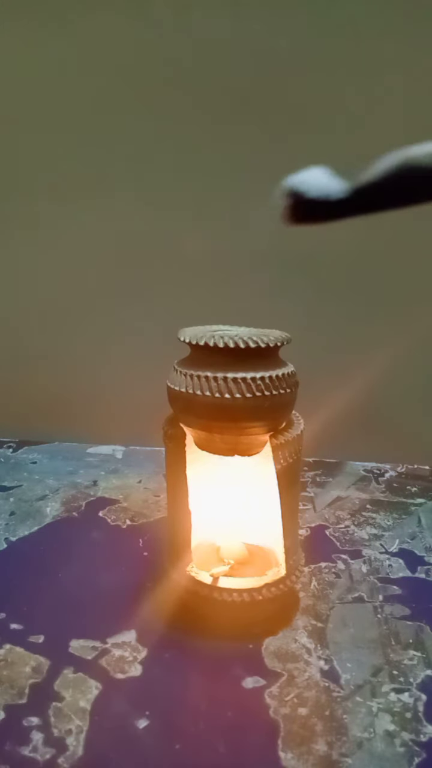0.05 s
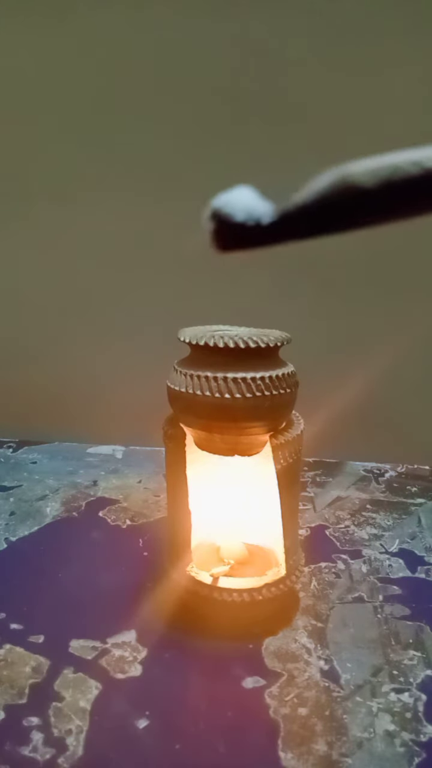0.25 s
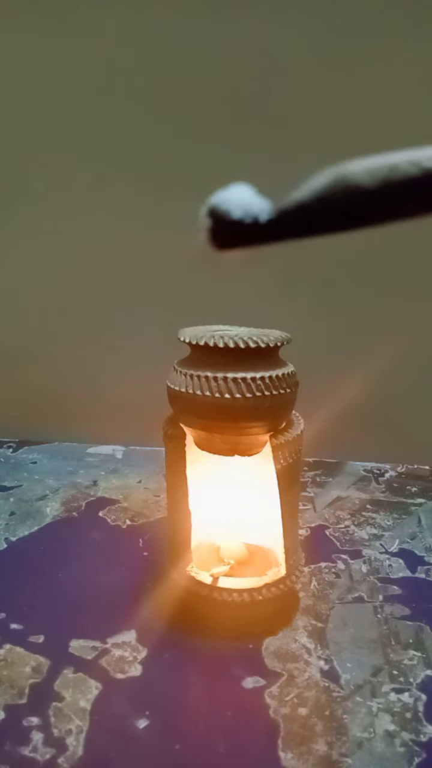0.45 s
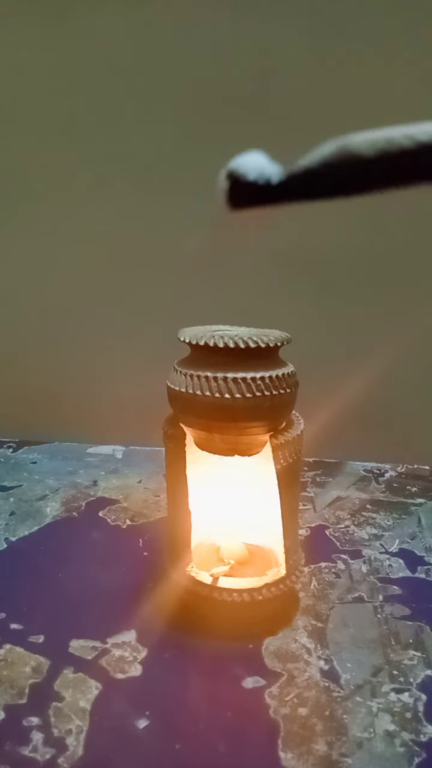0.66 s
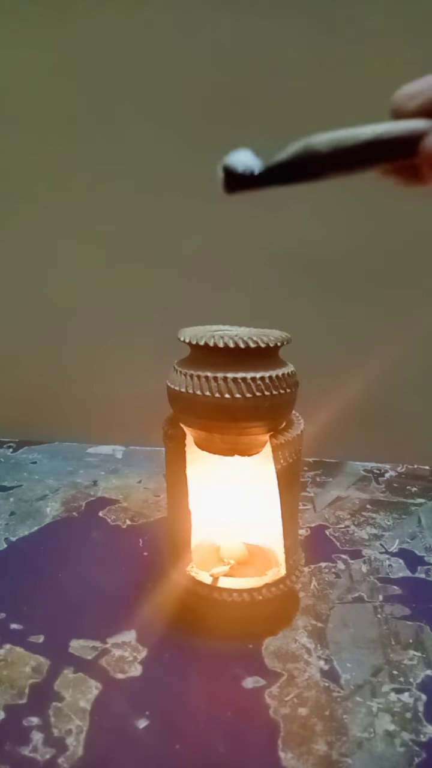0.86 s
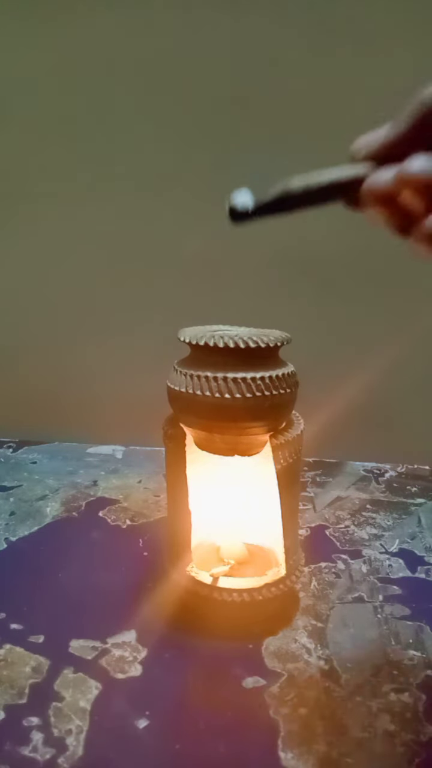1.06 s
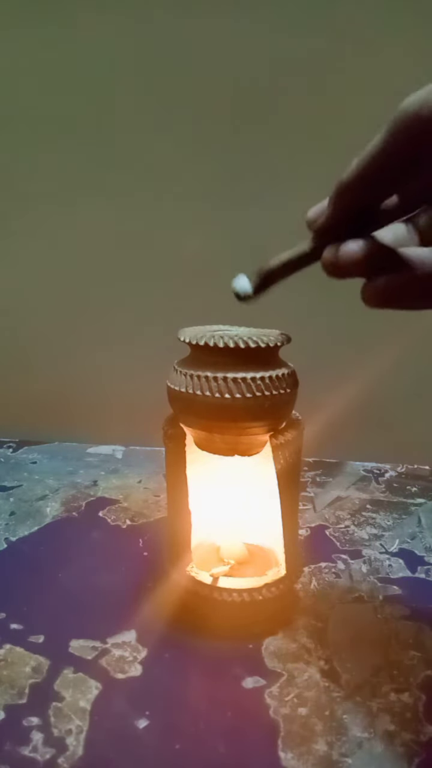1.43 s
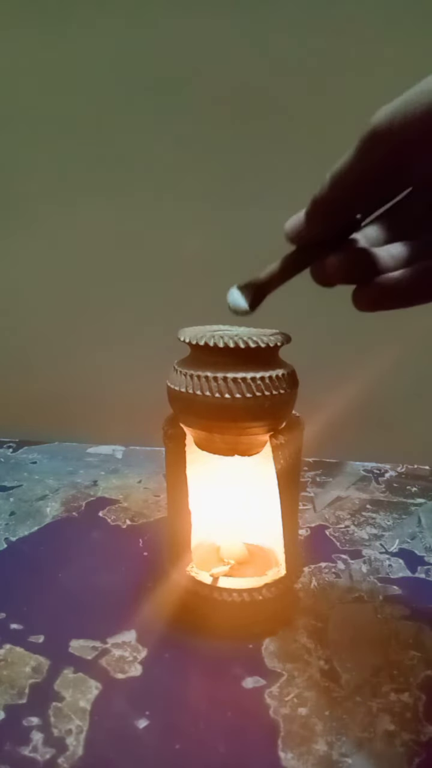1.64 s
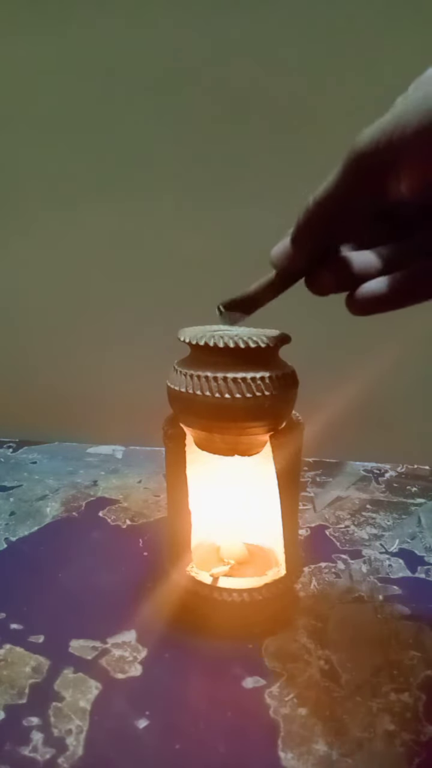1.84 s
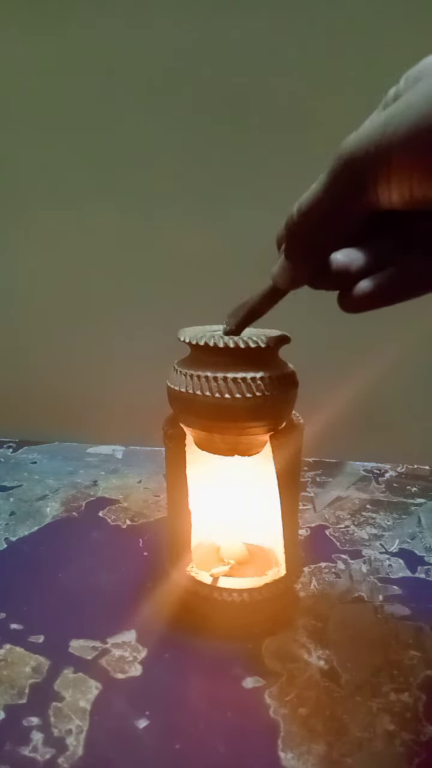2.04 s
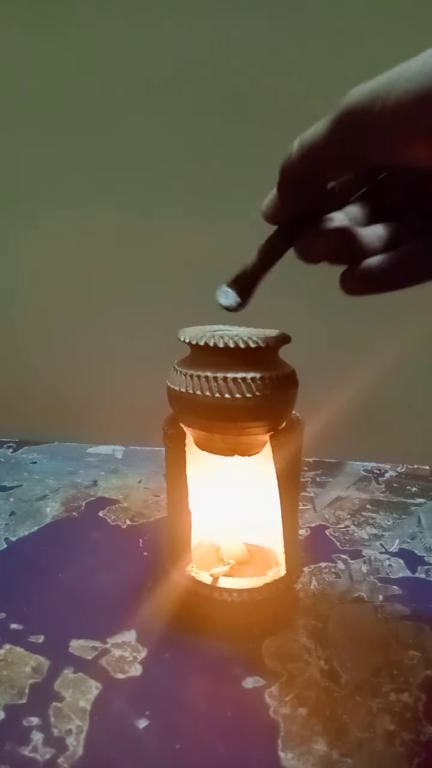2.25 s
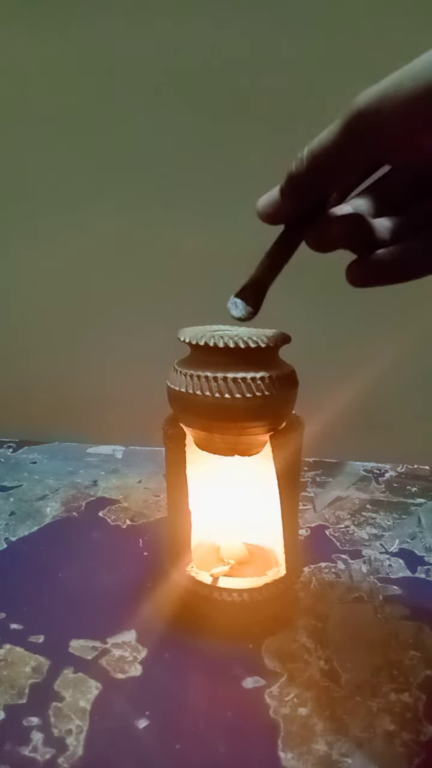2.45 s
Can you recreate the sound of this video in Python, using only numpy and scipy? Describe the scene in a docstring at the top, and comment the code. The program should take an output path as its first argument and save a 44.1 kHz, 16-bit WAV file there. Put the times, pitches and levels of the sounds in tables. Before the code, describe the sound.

A small stick knocks once on a clay toy stove over a faint hum.

```python
"""A motor hums over soft hiss in a small bare room. At 0.22 s a small stick knocks on a clay toy stove:
a light touch, the main blow 10 ms later, a short rebound. The clay rings briefly, the room answers
and a limiter ducks the blow. Faint bumps, ticks and a tap of handling follow while an airy rustle
swells and fades. Around 2 s the stick tip grazes the clay, and the hum carries on."""
import sys
import numpy as np
from scipy import signal
from scipy.fft import rfft, irfft
from scipy.io import wavfile
from scipy.ndimage import uniform_filter1d, minimum_filter1d

SR = 44100
rng = np.random.default_rng(int(sys.argv[2]) if len(sys.argv) > 2 else 0)


def log_audio(samples):
    """Write samples as a 16-bit WAV file to the path given in sys.argv[1]."""
    # one column per channel
    frames = np.atleast_2d(samples).T
    # limit to full scale, then quantise
    limited = np.clip(frames, -1, 1)
    pcm = np.round(limited * 32767).astype(np.int16)
    wavfile.write(sys.argv[1], SR, pcm)


N = 114660
TIME_S = np.arange(N) / SR

# touch, blow and rebound of the stick: start_s, strength_db, treble_edge_hz
KNOCK_CONTACTS = [(0.2246, -3, 1910), (0.2340, 9, 4140), (0.2381, -6, 3560)]


def pushes(contacts):
    """One short push per contact, each with its own strength and treble edge."""
    click = signal.unit_impulse(N)
    return sum(undb(db) * delay(butter(click, edge_hz, "low"), s) for s, db, edge_hz in contacts)


def stove():
    """The clay's answer to one push: a crack, a short ring, close reflections off stove and table top."""
    # ringing modes of the clay: pitch_hz, level_db, t60_s
    clay_modes = [(295, -25, 0.064), (448, -26.5, 0.063), (515, -35.5, 0.099), (735.6, -36.5, 0.19),
                  (910, -20, 0.014), (1230, -27, 0.03), (1455, -27.5, 0.024), (1846, -21, 0.032),
                  (2130, -25.5, 0.034), (2520, -48, 0.082), (2927, -4.5, 0.011), (3204, -5.5, 0.02),
                  (3574, -20, 0.038), (4220, -17, 0.015), (4940, -35.5, 0.031), (7760, -48, 0.14),
                  (11650, -79.5, 0.2)]
    # spectrum of the contact's crack: frequency_hz, level_db
    crack_spectrum = [(120, -18.5), (300, 10.5), (900, 13.5), (1800, 12.5), (3000, 28), (4100, -8),
                      (5500, -11.5), (8000, -0.5), (11000, -22), (15000, -20.5)]
    modes = sum(undb(db) * fade(t60) * np.cos(2 * np.pi * hz * TIME_S) for hz, db, t60 in clay_modes)
    attack = 1 - np.exp(-(TIME_S / 0.00037) ** 2)
    ring = undb(0.5) * modes * attack
    body = butter(ring + colour(crack_spectrum), 260, "high", order=4)
    reflections = unit(noise_burst(t60_s=0.064) * rise(0.0047))
    return body + undb(-14.5) * convolve(body, reflections)


def crunch():
    """Rough clay crunches at each contact of the knock: a very short spit of bright noise."""
    burst = unit(butter(noise_burst(t60_s=0.02), 6400, "high", order=4))
    return undb(-33) * sum(undb(db) * delay(burst, s) for s, db, _ in KNOCK_CONTACTS)


def tap():
    """One faint push on the stove as it is handled."""
    # the soft contact: start_s, strength_db, treble_edge_hz
    tap_contacts = [(0.8608, -36.5, 2750)]
    return pushes(tap_contacts)


def bumps():
    """Dull bumps of handling: soft contacts with a rounded attack and no treble."""
    # thuds: start_s, level_db, centre_hz, width_octaves, t60_s
    thuds = [(0.401, -17.5, 550, 1.65, 0.094), (0.857, -27.5, 530, .45, 0.065),
             (1.442, -26.5, 464, 1.1, 0.44), (1.48, -12.5, 90, 0.92, 0.15), (1.57, -11.5, 88.5, 0.96, 0.14)]
    out = 0
    for start_s, db, centre_hz, octaves, t60_s in thuds:
        band_hz = centre_hz * 2 ** (np.array([-0.5, 0.5]) * octaves)
        thud = butter(noise_burst(t60_s) * rise(0.0093), band_hz, "band")
        out += undb(db) * delay(unit(thud), start_s)
    return out


def ticks():
    """Tiny bright ticks of handling, each a noise burst about an octave wide."""
    # clicks: start_s, level_db, centre_hz, t60_s
    clicks = [(0.516, -40.5, 5560, .03), (0.951, -48, 9000, 0.0062), (1.6054, -49, 4370, 0.033),
              (1.6801, -40.5, 5230, 0.072), (1.8588, -38, 10900, 0.03)]
    out = 0
    for start_s, db, centre_hz, t60_s in clicks:
        click = butter(noise_burst(t60_s), centre_hz * np.exp([-0.35, 0.35]), "band")
        out += undb(db) * delay(unit(click), start_s)
    return out


def grit():
    """Sparse bright grains while the stick tip grazes the clay."""
    start_s, end_s, grains_per_s = 1.87, 2.22, 40
    grazing = (TIME_S > start_s) & (TIME_S < end_s)
    hits = (rng.random(N) < grains_per_s / SR) * grazing * rng.uniform(0.32, 1, N)
    grain = unit(butter(noise_burst(t60_s=0.035), 9500, "high"))
    return undb(-54) * convolve(hits, grain)


def room(direct):
    """The bare room's diffuse tail builds quickly; its bass lasts a little longer than its treble."""
    # tone of the tail: frequency_hz, gain_db
    tail_spectrum = [(150, -6.5), (300, -2), (600, 1.5), (740, 5.5), (900, -4), (1400, -3.5), (2400, -1),
                     (3100, -7.5), (4200, -1.5), (6000, -8.5), (9000, 0.5), (15000, 2)]
    noise = rng.standard_normal(N)
    bass = butter(noise, 800, "low", order=1)
    treble = noise - bass
    tail = unit((bass * fade(t60_s=0.5) + treble * fade(t60_s=0.47)) * rise(0.006))
    return undb(-13) * convolve(direct, convolve(tail, colour(tail_spectrum)))


def motor_hum():
    """Harmonics of the motor's turning rate; the third and sixth dominate, swelling and sinking."""
    # swell of the two strong harmonics: time_s, third_rms_db, sixth_rms_db
    swell = [(0, -54, -54), (0.139, -46.5, -49.5), (.35, -54, -52), (.46, -47, -45), (.51, -49.5, -55.5),
             (.61, -48, -47.5), (.82, -53, -47), (.93, -47, -41.5), (1.12, -53.5, -44.5),
             (1.19, -50.5, -50), (1.78, -49, -51.5), (1.82, -54, -51), (2.241, -48.5, -47.5),
             (2.44, -57, -47), (2.5, -49, -41.5), (2.6, -49, -45)]
    # weaker harmonics, each wavering about its level: harmonic_number, rms_db
    weak_harmonics = [(2, -65.5), (4, -64.5), (5, -59), (7, -60.5), (8, -76), (9, -70.5), (10, -74),
                      (12, -76.5)]
    turning_hz, speed_wander, waver_db = 38.37, 0.003, 3.5
    turns = np.cumsum(turning_hz * (1 + speed_wander * drift(4.13))) / SR
    times_s, third_db, sixth_db = np.array(swell).T
    harmonics = [(3, np.interp(TIME_S, times_s, third_db)), (6, np.interp(TIME_S, times_s, sixth_db))]
    harmonics += [(k, db + waver_db * drift(5.74)) for k, db in weak_harmonics]
    return np.sqrt(2) * sum(undb(db) * np.sin(2 * np.pi * (k * turns + rng.random())) for k, db in harmonics)


def air():
    """Room tone: low rumble and soft hiss, gently rising and falling."""
    # spectrum of the room tone: frequency_hz, relative_db
    air_spectrum = [(25, -11.5), (50, -8.5), (85, 4.5), (150, 0), (280, -4.5), (420, -10), (700, -15.5),
                    (1400, -25.5), (2300, -18), (3100, -16.5), (4100, -21.5), (5200, -35.5), (6700, -43.5),
                    (8600, -35), (11000, -46.5), (15500, -46.5)]
    # slow level ride: time_s, boost_db
    level_ride = [(0, 2.5), (.55, 1.5), (.9, 3.5), (1.3, 2), (1.8, 2.5), (2.15, 0.9), (2.6, 2)]
    noise = unit(convolve(rng.standard_normal(N), colour(air_spectrum))) * np.sqrt(N)
    boost_db = np.interp(TIME_S, *np.array(level_ride).T)
    return noise * undb(-58 + boost_db)


def whines():
    """Thin wavering tones that come and go in the hiss."""
    # narrow noise bands: centre_hz, width_hz, rms_db
    bands = [(2230, 70, -81), (2790, 90, -79), (3070, 260, -76)]
    waver_db, out = 3, 0
    for hz, width_hz, db in bands:
        level = undb(db + waver_db * drift(20))
        tone = butter(rng.standard_normal(N), [hz - width_hz / 2, hz + width_hz / 2], "band")
        out += level * np.sqrt(N) * unit(tone)
    return out


def rustle():
    """One broad, gentle swell of high hiss."""
    peak_s, spread_s = 0.87, 0.76
    swell = np.exp(-((TIME_S - peak_s) / spread_s) ** 2)
    return undb(-80) * swell * butter(rng.standard_normal(N), 7600, "high")


def undb(db):
    """Decibels to gain."""
    return 10 ** (np.asarray(db) / 20)


def rise(attack_s):
    """Rounded attack with time constant attack_s."""
    return 1 - np.exp(-TIME_S / attack_s)


def fade(t60_s):
    """Exponential decay, 60 dB in t60_s."""
    return np.exp(-np.log(1000) * TIME_S / t60_s)


def noise_burst(t60_s):
    """White noise that dies away."""
    return rng.standard_normal(N) * fade(t60_s)


def unit(x):
    """Scale to unit energy."""
    return x / np.sqrt(np.sum(x ** 2))


def convolve(x, response):
    """Pass a sound through an impulse response."""
    return signal.fftconvolve(x, response)[:N]


def colour(points):
    """Minimum-phase impulse response whose spectrum follows (Hz, dB) points."""
    hz, db = np.array(points).T
    freqs = np.maximum(np.arange(N // 2 + 1) * SR / N, 1)
    gain = undb(np.interp(np.log(freqs), np.log(hz), db))
    cepstrum = irfft(np.log(gain), N)
    cepstrum[1:N // 2] *= 2
    cepstrum[N // 2 + 1:] = 0
    return irfft(np.exp(rfft(cepstrum)), N)


def butter(x, hz, kind, order=2):
    """Plain low-, high- or band-pass."""
    return signal.sosfilt(signal.butter(order, hz, kind, fs=SR, output="sos"), x + 1e-18)


def delay(x, s):
    """Start a sound s seconds later."""
    return np.concatenate([np.zeros(round(s * SR)), x])[:N]


def drift(rate_hz):
    """Slow random drift with a spread near 1."""
    hold = int(SR / rate_hz)
    steps = np.repeat(rng.standard_normal(N // hold + 1), hold)
    return uniform_filter1d(uniform_filter1d(steps, hold), hold)[:N] * np.sqrt(2)


def scene():
    """Knock and handling in the room, over hiss and motor hum."""
    clay = convolve(pushes(KNOCK_CONTACTS) + tap(), stove())
    direct = clay + crunch() + ticks() + grit()
    return (direct + room(direct) + bumps() + air() + whines() + rustle() + motor_hum())[None]


def record(dry):
    """A limiter ducks at the blow and recovers steadily, holding up the room's tail; the top is cut."""
    ceiling_db, recovery_db_per_s, lookahead_s, top_hz = -0.52, 81, 0.002, 15500
    over_db = np.maximum(20 * np.log10(np.abs(dry[0]) + 1e-9) - ceiling_db, 0)
    recovered_db = recovery_db_per_s * TIME_S
    gain_db = recovered_db - np.maximum.accumulate(over_db + recovered_db)
    ahead = int(lookahead_s * SR)
    smooth_gain_db = uniform_filter1d(minimum_filter1d(gain_db, ahead), ahead)
    top_cut = signal.ellip(8, 0.2, 70, top_hz, fs=SR, output="sos")
    return signal.sosfilt(top_cut, dry * undb(smooth_gain_db))


dry = scene()
out = record(dry)
log_audio(out)
```